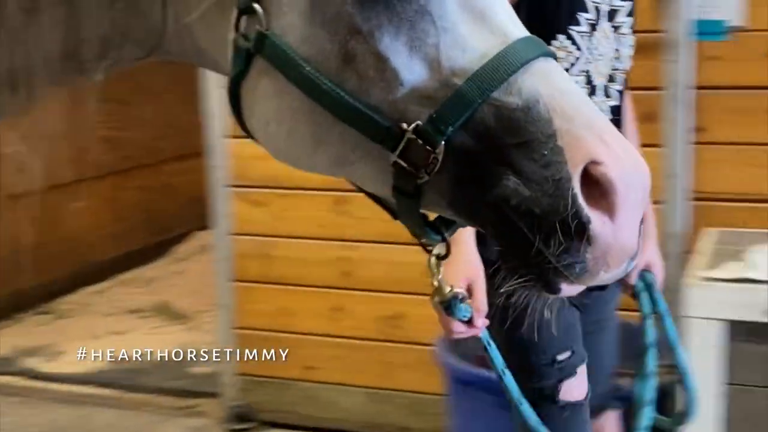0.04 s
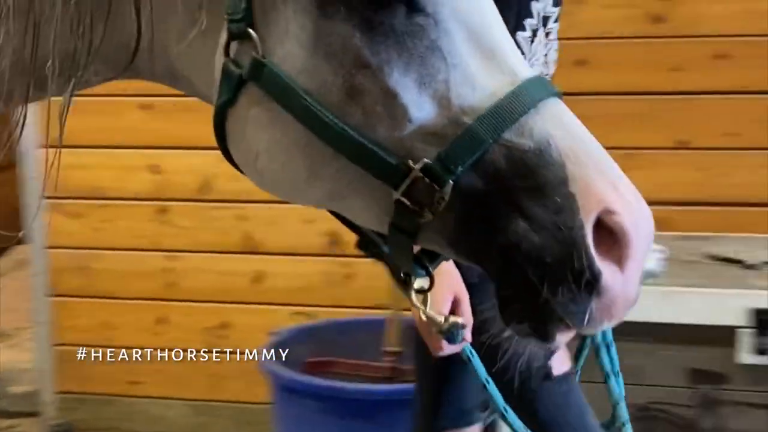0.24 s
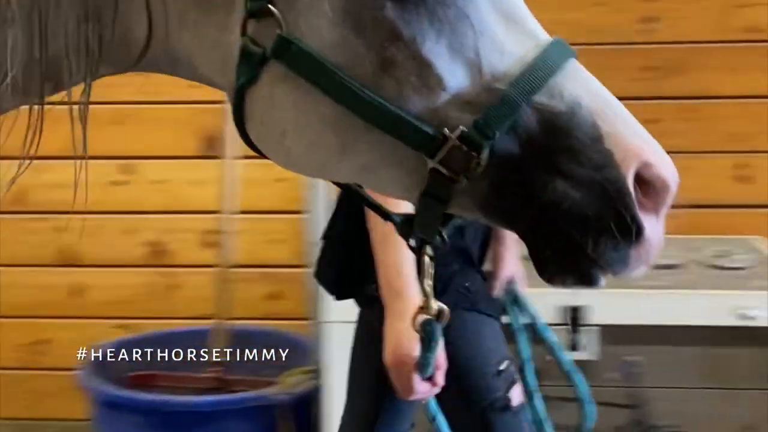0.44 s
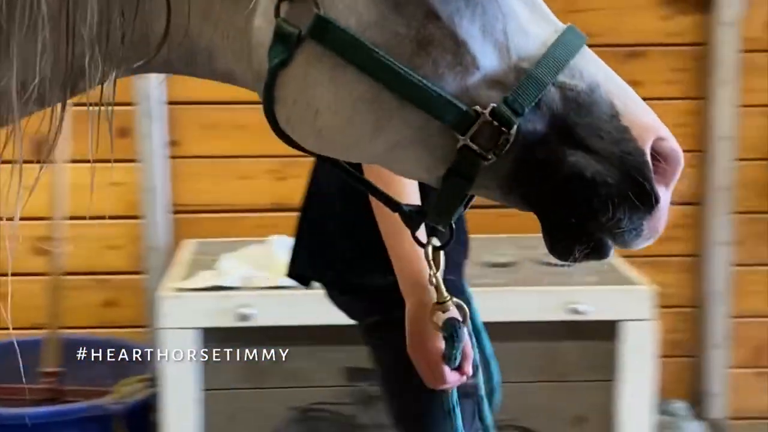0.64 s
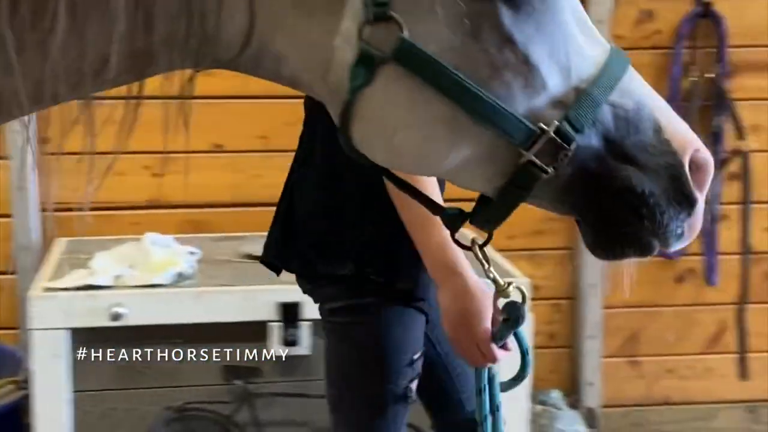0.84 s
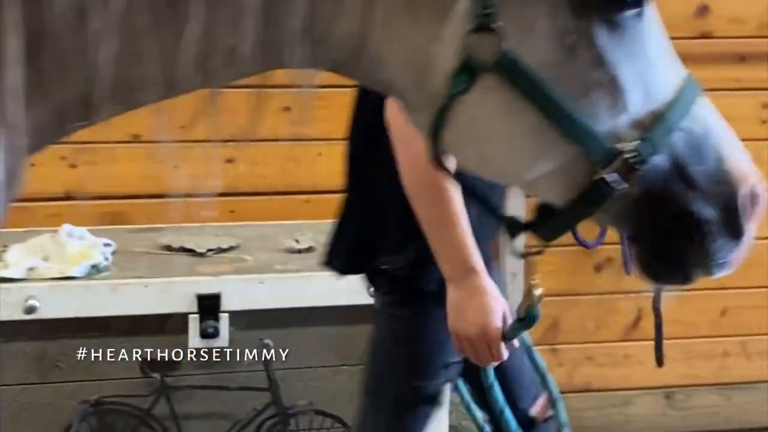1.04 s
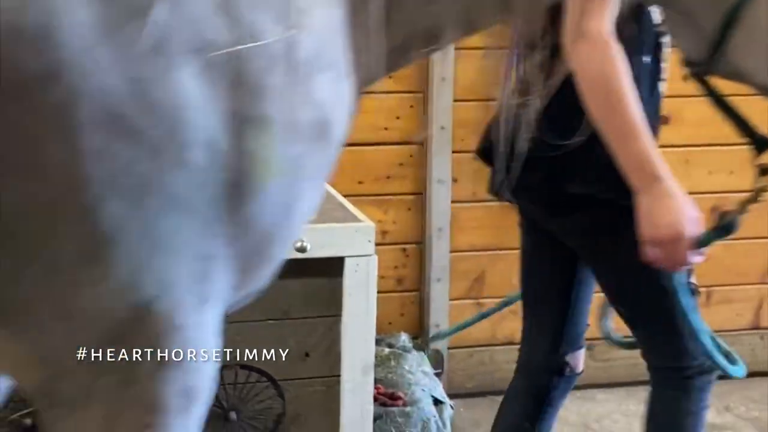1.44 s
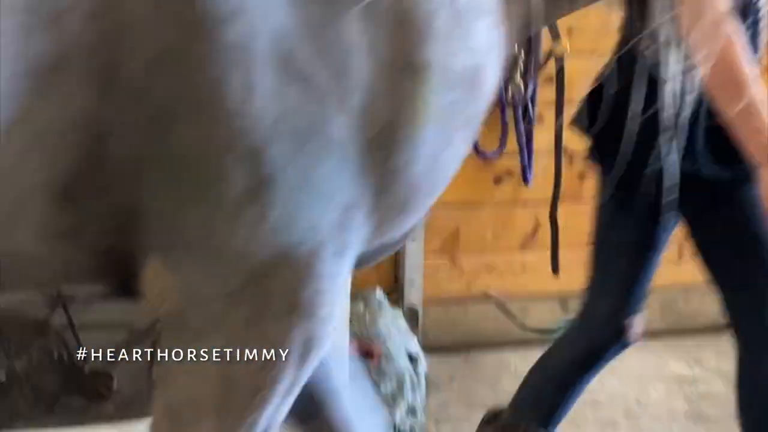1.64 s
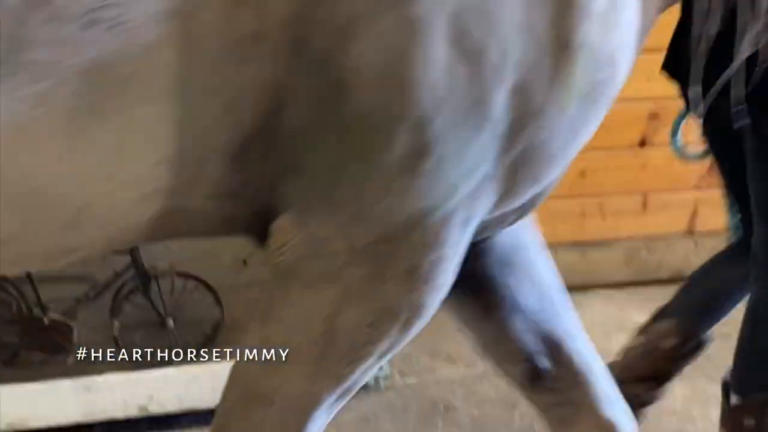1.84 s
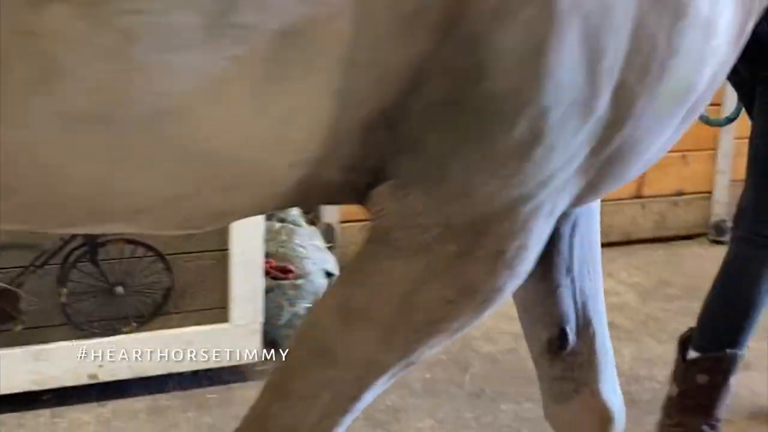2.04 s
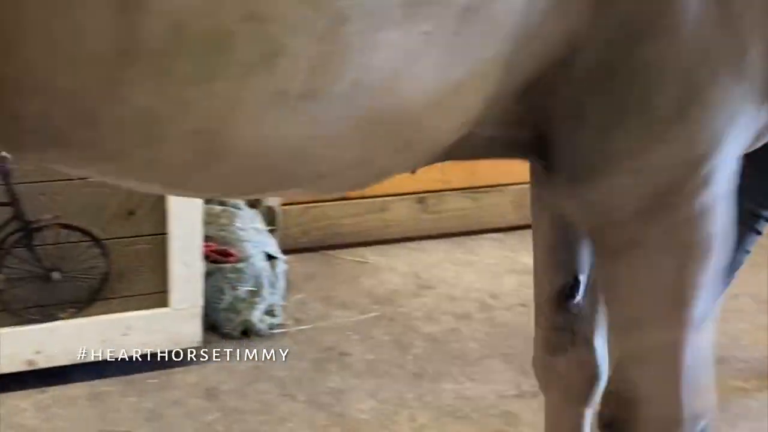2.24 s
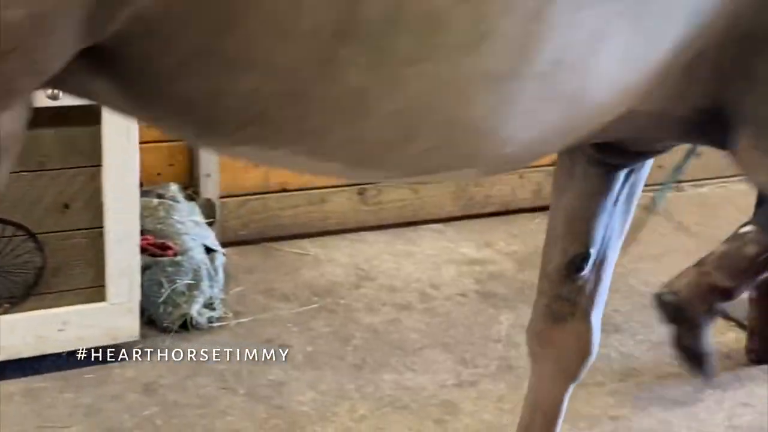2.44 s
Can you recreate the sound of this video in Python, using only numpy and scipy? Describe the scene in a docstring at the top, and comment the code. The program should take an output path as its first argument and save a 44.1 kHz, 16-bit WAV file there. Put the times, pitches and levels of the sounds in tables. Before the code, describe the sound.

Hollow hoof clops of a horse at a walk pass close by, some with a gritty crackle. Softer boot steps and light scuffs fall between them, and the wooden stable adds brief reverberation and a faint low rumble.

```python
"""Over a low rumble come the hollow knocks of a horse led at a walk on a wooden stable's hard floor.
Each hoof lands toe first, then flat, exciting its damped modes; some crush grit, which cracks.
Beside it the handler's boots scuff, tap and thud, and heavy steps set the stable booming.
The plank walls return early echoes and a short reverberant tail."""
import sys
import numpy as np
from scipy import signal
from scipy.fft import rfft, irfft, next_fast_len
from scipy.io import wavfile

SR = 44100
rng = np.random.default_rng(int(sys.argv[2]) if len(sys.argv) > 2 else 0)


def pcm_store(signal):
    """Save signal as 16-bit PCM."""
    levels = np.round(np.clip(np.atleast_2d(signal), -1, 1) * 32767)
    wavfile.write(sys.argv[1], SR, levels.astype(np.int16).T)


N = 110250
T = np.arange(N) / SR
IMPACT_T = T[:SR // 4]
IMPACT_HZ = np.fft.rfftfreq(len(IMPACT_T), 1 / SR)

# Levels are relative gains; t60 is the time to decay by 60 dB.
# background spectra: frequency_hz, level_db
RUMBLE_SPECTRUM = [(20, -35), (35, -5), (55, -4.5), (74, 2), (95, -14), (120, -5), (160, -16), (220, -13.5),
                   (340, -15.5), (450, -28.5), (600, -34.5), (1000, -50), (3000, -83.5)]
HISS_SPECTRUM = [(300, -16), (600, -9), (1000, 0.5), (1800, -9), (2600, -6), (5500, -13.5), (10000, -17),
                 (13000, -23)]
# rise and fall of the hiss: time_s, level_db
HISS_ENVELOPE = [(0, -60), (.15, -64.5), (.8, -62.5), (1.15, -59.5), (1.45, -67.5), (1.6, -67), (1.76, -65),
                 (1.9, -66), (2.15, -57), (2.35, -63.5), (2.5, -70.5)]
# grit under a hoof: start_s, level_db, decay_s, lower_hz, upper_hz, tilt_db_per_octave, ring_db
GRIT_CRACKS = [(0.109, -60, 0.015, 2570, 6460, -2, -82), (0.211, -43, 0.014, 2420, 6110, -4, -66),
               (0.5302, -28, 0.0053, 3550, 6500, -3, -53), (0.5421, -9, 0.0027, 2330, 6340, -1, -44.5),
               (0.9473, -36.5, 0.0043, 2520, 4390, -14, -58), (1.2137, -21.5, 0.0029, 2776, 5970, 3, -45.5),
               (1.230, -40, 0.01, 2690, 5780, 14, -64), (1.523, -57, 0.0058, 2530, 4320, 2, -77.5),
               (1.657, -34.5, 0.0029, 2380, 3470, -10.5, -66),
               (1.9577, -19.5, 0.0009, 3350, 5850, -5.5, -41), (1.9769, -18, 0.0032, 2690, 5560, -4.5, -30),
               (2.322, -54, 0.016, 2630, 5850, 4.5, -77.5)]
# single hard grains snapping: start_s, level_db
GRAIN_SNAPS = [(.213, -40), (.3415, -36), (.9482, -36), (1.9772, -22), (2.323, -46)]
# hoof knocks and their faint wall echoes: start_s, knock_db, pitch_hz, t60_s, thump_db, edge_db
HOOF_KNOCKS_AND_ECHOES = [(0.1983, -28, 1428, 0.036, -36, -26.5), (0.2119, -15, 1023, 0.016, -22.5, -30),
                          (0.2185, -21, 1049, 0.061, -35.5, -47), (0.5321, -11, 1125, 0.014, -35, -24),
                          (0.5375, -15.5, 935, 0.027, -26.5, -58), (0.544, -8, 900, 0.019, -30.5, -21),
                          (.567, -26.5, 951, 0.025, -35, -49.5), (0.9346, -32.5, 1170, 0.015, -42.5, -34.5),
                          (0.9473, -17.5, 1059, 0.018, -32, -29), (.961, -31, 998, 0.026, -58, -33),
                          (1.2139, -33, 1026, 0.018, -39.5, -33), (1.2324, -15.5, 1046, 0.021, -29.5, -27),
                          (1.2787, -32.5, 916, 0.023, -57, -50), (1.523, -49.5, 844, 0.028, -49.5, -46),
                          (1.657, -16, 1142, 0.012, -31, -35), (1.9592, -11, 1775, 0.004, -54.5, -50.5),
                          (1.9598, -14.5, 1078, 0.016, -26, -34.5), (1.974, -18, 883, 0.024, -24, -25.5),
                          (2.31, -38.5, 1098, 0.034, -37.5, -40), (2.3224, -26.5, 1150, 0.014, -28.5, -36),
                          (2.3293, -36, 1213, 0.023, -43.5, -36.5)]
# modes of the hoof wall and of the boot sole: pitch_ratio, level_db, t60_ratio
HOOF_WALL_MODES = [(1.0, 6, 0.94), (1.46, -12.5, 0.69), (.56, -13, 0.86), (.85, -14, 0.35),
                   (2.25, -20.5, 1)]
BOOT_SOLE_MODES = [(1.0, 5, 0.78), (.75, -23, 1.4), (1.7, -23, 4.6)]
# soles, hooves and clothes brushing: start_s, level_db, decay_s, tilt_db_per_octave
SCUFF_CONTACTS = [(0.341, -43.5, 0.017, 5.5), (.384, -40, 0.0036, -5.5), (0.439, -49, 0.024, 10),
                  (1.733, -52.5, 0.0057, -8), (1.773, -54, 0.0042, -2), (2.296, -55, 0.014, -13.5)]
# boot contacts: start_s, thud_db, pitch_hz, t60_s, tap_db, tap_hz, edge_db
BOOT_CONTACTS = [(0.342, -14, 307, .028, -23, 1044, -31), (0.4357, -35.5, 316, .04, -20.5, 990, -33),
                 (1.036, -14, 335.6, 0.018, -15.5, 1142, -26), (1.0405, -26.5, 573, 0.037, -29, 900, -46),
                 (1.6286, -23.5, 316, 0.024, -23.5, 1067, -51), (1.644, -21, 284, 0.023, -21, 1126, -38),
                 (2.1045, -11.5, 364, 0.017, -28, 1106, -36), (2.117, -24, 399, 0.04, -30.5, 1140, -60),
                 (2.2295, -11.5, 363, 0.013, -18.5, 1220, -33), (2.2332, -21.5, 413, 0.01, -30, 694, -37.5)]
# stable resonances after heavy steps: start_s, level_db, pitch_hz, t60_s
ROOM_BOOMS = [(.352, -24.5, 248.7, 0.24), (0.441, -29, 318.6, 0.24), (0.544, -27.5, 247.3, 0.17),
              (0.551, -23.5, 70.8, 0.17), (1.232, -31, 249.5, 0.16), (2.06, -34, 262, 0.24),
              (2.124, -31.5, 286.5, 0.2)]
# spectra of impact and friction noise: frequency_hz, level_db
GRIT_SPECTRUM = [(1000, -30), (1800, -19), (2400, 0.5), (3050, -6.5), (3650, -1.5), (4400, -5.5),
                 (5000, -6), (6400, -6), (7250, -11), (8300, -7), (9000, -17), (10200, -7.5),
                 (11000, -21.5), (15000, -38)]
SNAP_SPECTRUM = [(4000, -28), (8000, -16), (11000, -2), (13000, 1.5), (15500, 16.5), (18000, -13)]
EDGE_SPECTRUM = [(400, -2.5), (700, 3.5), (1000, 8.5), (1600, 11), (2000, 2), (2500, 2.5), (3500, -6.5),
                 (6000, -19), (9000, -37.5), (13000, -26)]
SCUFF_SPECTRUM = [(600, -29.5), (2000, -9), (4500, -7), (6000, -6.5), (8500, -5), (11000, -5.5),
                  (13000, -3), (15000, -27.5)]
SWISH_SPECTRUM = [(2000, -4.5), (2600, 9.5), (4500, -2.5), (5500, 8), (6500, -13.5), (10000, -15.5)]
# early reflections: delay_s, level_db, left_minus_right_db
GRIT_REFLECTIONS = [(0.014, -14, 0), (0.081, -24.5, 0.77)]
HOOF_REFLECTIONS = [(.0078, -16.5, 0.5), (0.0146, -23.5, 0), (0.024, -20, -17.5), (0.038, -26, 1.5),
                    (.048, -30.5, 0), (.068, -29, 2)]
BOOT_REFLECTIONS = [(0.0116, -21, 1), (0.016, -18.5, -2.3), (0.0244, -26, 2), (.036, -19.5, -1.6)]
# reverberation of the stable: frequency_hz, level_db, t60_s
ROOM_DECAY = [(72, 10.5, 0.88), (238, -5.5, 0.89), (540, -5, 0.41), (1088, -11, 0.39), (1600, -13.5, 0.51),
              (2570, 1.5, 0.39), (6300, 0.5, 0.4), (8100, 0.5, .34), (11000, -2, 0.36)]
# likeness of left and right in the room's field and in bursts: frequency_hz, correlation
ROOM_COHERENCE = [(60, 1.0), (270, 0.99), (600, 0.63), (1250, 0.49), (2300, 0.23), (4000, 0.68),
                  (6000, 0.6), (9000, 0.76)]
BURST_COHERENCE = [(600, 1), (1400, 1), (2400, 0.24), (4000, 1), (6000, 0.82), (9000, 1)]
# the two microphone ports: frequency_hz, left_lead_rad, left_minus_right_db
PORT_RESPONSE = [(200, 0, 0), (600, 0.6, 0.5), (1000, 0.37, -2), (2140, 0.23, -0.5), (2930, 2.6, -0.5),
                 (3870, 1.5, -2.5), (4700, 1.9, -1), (5770, -0.94, -0.5), (7540, 1.8, -1), (9000, 1.8, 0),
                 (12500, 3, 0)]


def from_db(db):
    """Amplitude grows tenfold for every 20 dB."""
    return 10 ** (np.asarray(db) / 20)


def at_hz(table, hz, column=1):
    """A response is interpolated linearly over log frequency."""
    table = np.array(table)
    return np.interp(np.log(hz + 1), np.log(table[:, 0]), table[:, column])


def add(track, start_s, sound):
    """Superposition: a sound sums into the track from its start time."""
    start = int(start_s * SR)
    track[..., start:start + sound.shape[-1]] += sound[..., :N - start]


def butterworth(x, order, hz, kind):
    """A Butterworth filter rolls off by 6 dB per octave for each order."""
    return signal.sosfilt(signal.butter(order, hz, kind, fs=SR, output="sos"), x)


def panned(x, db):
    """A level difference, left minus right, gives a sound its direction."""
    return from_db([[db / 2], [-db / 2]]) * x


def reflected(x, reflections):
    """Floor and walls add delayed, weaker copies to a nearly central direct sound."""
    echoes = sum(panned(from_db(db) * np.interp(T - delay_s, T, x, left=0), pan_db)
                 for delay_s, db, pan_db in reflections)
    return panned(x, db=0.3) + echoes


def ring(hz, t60, attack_s, sag=0, sag_s=0.0048):
    """A damped oscillator builds up, then decays; it starts sharp by the fraction sag."""
    cycles = hz * (IMPACT_T + sag * sag_s * (1 - np.exp(-IMPACT_T / sag_s)))
    envelope = from_db(-60 * IMPACT_T / t60) * (1 - np.exp(-IMPACT_T / attack_s))
    return envelope * np.sin(2 * np.pi * cycles)


def noise(spectrum, coherence, size=N, extra_db=0):
    """Random phases give noise of unit rms; the mid-side balance sets its stereo correlation."""
    hz = np.fft.rfftfreq(size, 1 / SR)
    correlation = np.clip(at_hz(coherence, hz), -.999, .999)
    mid, side = np.exp(2j * np.pi * rng.random((2, len(hz))))
    stereo = np.sqrt(1 + correlation) * mid + np.sqrt(1 - correlation) * side * [[1], [-1]]
    x = irfft(from_db(at_hz(spectrum, hz) + extra_db) * stereo, size)
    return x / x.std()


def burst(db, decay_s, spectrum, tilt_db=0, peaks_db=0, attack_s=0.00039):
    """A transient is broadband noise with a sudden onset and exponential decay."""
    envelope = np.exp(-IMPACT_T / decay_s) * (1 - np.exp(-IMPACT_T / attack_s))
    shaping_db = tilt_db * np.log2(1 + IMPACT_HZ / 1000) + peaks_db
    x = envelope * noise(spectrum, BURST_COHERENCE, len(IMPACT_T), shaping_db)
    return from_db(db) * x * np.sqrt(2 * np.sum(envelope ** 2) / np.sum(x ** 2))


def background(rumble_db=-46.5):
    """Ambient noise: a steady low rumble and a faint, slowly amplitude-modulated hiss."""
    rumble = from_db(rumble_db) * noise(RUMBLE_SPECTRUM, ROOM_COHERENCE)
    hiss_db = np.interp(T, *np.transpose(HISS_ENVELOPE))
    return rumble + from_db(hiss_db) * noise(HISS_SPECTRUM, ROOM_COHERENCE)


def grit_cracks(half_width_hz=100):
    """Brittle fracture: grit bursts and excites two high hoof resonances; single grains snap."""
    cracks, ringing = np.zeros((2, N)), np.zeros(N)
    for start_s, db, decay_s, lower_hz, upper_hz, tilt_db, ring_db in GRIT_CRACKS:
        peaks_db = 0
        for hz, peak_db, partial_db in (lower_hz, 9.5, 0), (upper_hz, 12, -12.5):
            peaks_db += peak_db / (1 + ((IMPACT_HZ - hz) / half_width_hz) ** 2)
            add(ringing, start_s, from_db(ring_db + partial_db) * ring(hz, t60=0.12, attack_s=decay_s))
        add(cracks, start_s, burst(db, decay_s, GRIT_SPECTRUM, tilt_db, peaks_db))
    for start_s, db in GRAIN_SNAPS:
        add(cracks, start_s, burst(db, decay_s=0.0014, spectrum=SNAP_SPECTRUM))
    return cracks + reflected(ringing, GRIT_REFLECTIONS)


def hooves():
    """Impact thumps the floor and rings the hoof's modes, which sag under load; walls echo faintly."""
    knocks = np.zeros(N)
    thump = ring(hz=343, t60=0.031, attack_s=0.001)
    for start_s, knock_db, hz, t60, thump_db, _ in HOOF_KNOCKS_AND_ECHOES:
        attack_s = 0.04 * t60  # toe strikes are sharp; flat landings build up and ring longer
        knock = sum(from_db(mode_db) * ring(hz * ratio, t60 * t60_ratio, attack_s, sag=0.028)
                    for ratio, mode_db, t60_ratio in HOOF_WALL_MODES)
        add(knocks, start_s, from_db(knock_db) * knock + from_db(thump_db) * thump)
    return reflected(knocks, HOOF_REFLECTIONS) + hard_edges(HOOF_KNOCKS_AND_ECHOES)


def hard_edges(knocks, pivot_db=-21):
    """Each knock opens with a rough noise transient: the harder it is, the brighter its spectrum."""
    edges = np.zeros((2, N))
    for start_s, *_, db in knocks:
        tilt_db = 1.1 * (db - pivot_db)
        add(edges, start_s, burst(db, decay_s=0.0053, spectrum=EDGE_SPECTRUM, tilt_db=tilt_db))
    return edges


def brushing(grain_db=5.5, grains_per_s=700, swish_s=0.872, swish_width_s=0.1, swish_db=-65):
    """Friction noise: scuffs catch unevenly on grit, and one faint swish passes between steps."""
    scuffs = np.zeros((2, N))
    for start_s, db, decay_s, tilt_db in SCUFF_CONTACTS:
        add(scuffs, start_s, burst(db, decay_s, SCUFF_SPECTRUM, tilt_db))
    roughness = np.interp(T * grains_per_s, np.arange(N), rng.standard_normal(N))
    catching = from_db(grain_db * roughness)
    catching /= np.sqrt(np.mean(catching ** 2))
    swell = from_db(swish_db) * np.exp(-((T - swish_s) / swish_width_s) ** 2)
    return scuffs * catching + swell * noise(SWISH_SPECTRUM, ROOM_COHERENCE)


def boots(sole_lag_s=0.0018, low_cut_hz=244):
    """Two impacts in turn: the heel taps, then the sole's damped modes thud as it takes the weight."""
    steps = np.zeros(N)
    for start_s, thud_db, hz, t60, tap_db, tap_hz, _ in BOOT_CONTACTS:
        add(steps, start_s, from_db(tap_db) * ring(tap_hz, t60=0.0079, attack_s=0.00022))
        for ratio, mode_db, t60_ratio in BOOT_SOLE_MODES:
            mode = ring(hz * ratio, t60 * t60_ratio, attack_s=0.001)
            add(steps, start_s + sole_lag_s, from_db(thud_db + mode_db) * mode)
    steps = butterworth(steps, 2, low_cut_hz, "high")
    return reflected(steps, BOOT_REFLECTIONS) + hard_edges(BOOT_CONTACTS)


def room_boom():
    """Resonance: low modes of the stable swell and decay after heavy steps."""
    booms = np.zeros(N)
    for start_s, db, hz, t60 in ROOM_BOOMS:
        add(booms, start_s, from_db(db) * ring(hz, t60, attack_s=0.011))
    return booms


def reverberation(x, scatter_db, scatter_t60=0.079, onset_s=0.0021):
    """Nearby things scatter sound briefly; the stable's tail decays at its own rate in each band."""
    t, hz = T[:SR], np.fft.rfftfreq(SR, 1 / SR)
    white = rfft(noise([(1, 0)], ROOM_COHERENCE, size=SR))
    onset = 1 - np.exp(-(t / onset_s) ** 2)
    limits_hz = np.geomspace(45, 16000, 32)
    response = 0
    for low, high in zip(limits_hz, limits_hz[1:]):
        centre = np.sqrt(low * high)
        band = irfft(white * ((hz >= low) & (hz < high)), SR) * onset
        tail_db, tail_t60 = at_hz(ROOM_DECAY, centre), at_hz(ROOM_DECAY, centre, column=2)
        power = 0
        for db, t60 in (tail_db, tail_t60), (scatter_db, scatter_t60):
            decay = from_db(-60 * t / t60)
            power += (from_db(db) * decay) ** 2 / np.sum((band * decay) ** 2)
        response += band * 2 * np.sqrt(power * (high - low) / SR)
    return signal.fftconvolve(x, response, axes=1)[:, :N]


def microphone_ports(x):
    """Two ports receive the sound with phase and level differences that vary with frequency."""
    size = next_fast_len(N + len(IMPACT_T))
    hz = np.fft.rfftfreq(size, 1 / SR)
    lead_rad, difference_db = at_hz(PORT_RESPONSE, hz), at_hz(PORT_RESPONSE, hz, column=2)
    left = from_db(difference_db / 2) * np.exp(.5j * lead_rad)
    return irfft(rfft(x, size) * np.array([left, 1 / left]), size)[:, :N]


def scene():
    """Superposition of horse, handler, the stable's response and the background."""
    horse = hooves()
    handler = boots() + brushing()
    grit = grit_cracks()
    room = reverberation(horse + from_db(-6.5) * grit, scatter_db=-9)
    room += reverberation(handler, scatter_db=-5.5)
    return horse + handler + grit + room + room_boom() + background()


def record(dry):
    """Band limiting: the microphone loses the deepest bass and the top, then a steep low-pass follows."""
    x = butterworth(microphone_ports(dry), order=2, hz=71, kind="high")
    x = butterworth(x, order=5, hz=11600, kind="low")
    return butterworth(x, order=14, hz=15800, kind="low")


dry = scene()
out = record(dry)
pcm_store(out)
```